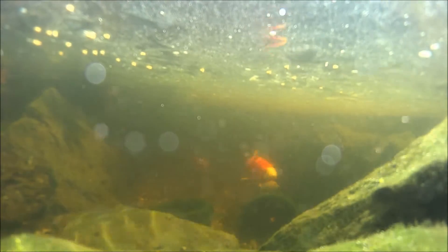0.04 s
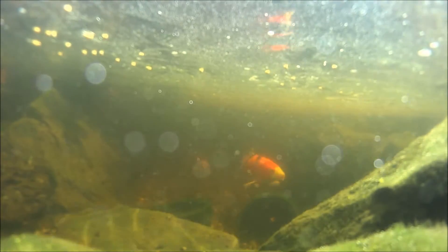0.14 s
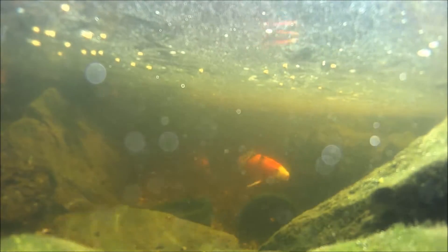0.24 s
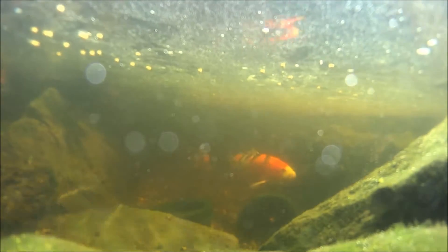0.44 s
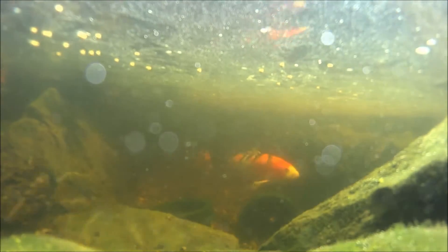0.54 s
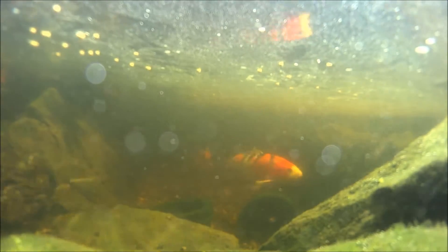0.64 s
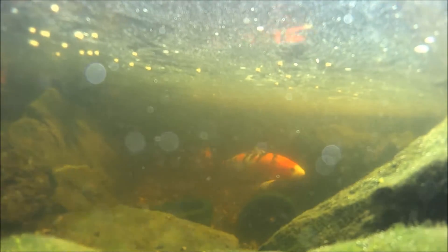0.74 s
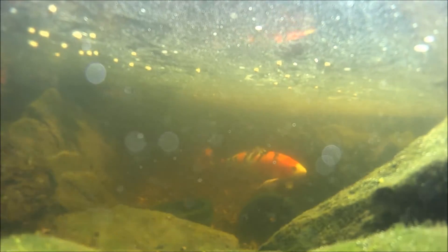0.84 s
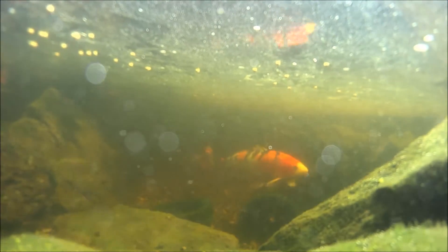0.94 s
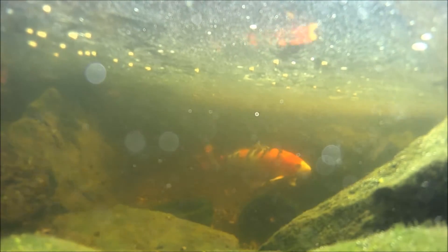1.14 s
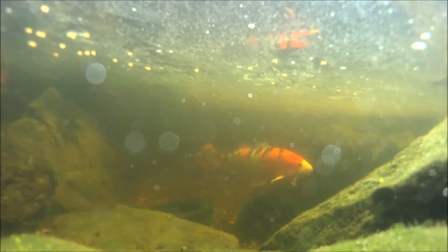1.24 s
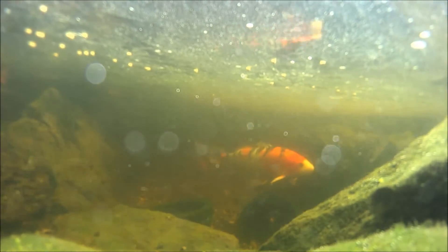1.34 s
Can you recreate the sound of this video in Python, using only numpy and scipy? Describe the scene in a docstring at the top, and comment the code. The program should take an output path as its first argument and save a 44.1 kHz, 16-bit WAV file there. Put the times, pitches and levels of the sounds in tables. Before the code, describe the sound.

A single short, hollow knock is heard from inside a camera case submerged in a pond, followed by three very faint bubble ticks. Behind it all, a pump hums quietly, moving water rumbles and the microphone hisses.

```python
"""Under water in a garden pond, heard from inside a waterproof camera case.
One soft knock sets the case ringing briefly. A pump hums, and the moving water rumbles and
faintly stirs the same ringing note. Three tiny ticks (probably bubbles) follow the knock,
and the microphone hisses throughout."""
import sys
import numpy as np
from scipy import signal
from scipy.fft import rfft, irfft
from scipy.io import wavfile
from scipy.ndimage import uniform_filter1d

SR = 44100
rng = np.random.default_rng(int(sys.argv[2]) if len(sys.argv) > 2 else 0)


def digitize_waveform(pressure):
    """Quantize a signal to 16-bit integers and store it at the path in sys.argv[1].

    Rows of a 2-D input are taken as channels; values are limited to [-1, 1].
    """
    field = np.atleast_2d(pressure).T
    bounded = np.clip(field, -1, 1)
    quanta = np.round(bounded * 32767).astype(np.int16)
    wavfile.write(sys.argv[1], SR, quanta)


N = 61739


def undb(db):
    """Turn decibels into a number to multiply by."""
    return 10 ** (np.asarray(db) / 20)


def unit(x):
    """Scale a sound to an average (rms) level of 1."""
    return x / np.sqrt(np.mean(x ** 2))


def pan(right_db):
    """Left and right gains that make the right side louder by right_db."""
    return undb(np.array([[-right_db], [right_db]]) / 2)


def noise(points):
    """Noise at level 1, its tone shaped by a curve through (Hz, dB) points."""
    hz, db = np.array(points).T
    freqs = np.maximum(np.fft.rfftfreq(N, 1 / SR), 1)
    curve = undb(np.interp(np.log(freqs), np.log(hz), db))
    return unit(irfft(rfft(rng.standard_normal(N)) * curve, N))


def ring(start, rise_s, fade_s):
    """Seconds since a blow, and a loudness curve that rises, then falls 60 dB in fade_s."""
    age = np.maximum(np.arange(N) / SR - start, 0)
    return age, (1 - np.exp(-age / rise_s)) * np.exp(-np.log(1000) * age / fade_s)


def hiss():
    """The microphone hisses: one noise is the same on both sides, one is flipped on the right."""
    # The shared hiss. Each row: frequency in Hz, level in dB.
    shared = [(30, -5), (300, -16), (800, 1.5), (2000, -2.5), (5000, -5), (11000, -7.5)]
    # The flipped hiss, which adds width. Each row: frequency in Hz, level in dB.
    flipped = [(30, -12), (200, -2), (650, 3), (1100, 0.5), (2000, -3), (3500, -9), (6200, -14),
               (11000, -21)]
    return undb(-60) * noise(shared) + undb(-56.5) * noise(flipped) * np.array([[1], [-1]])


def water():
    """Moving water rumbles and keeps the main note of the case faintly ringing."""
    # The water as heard through the case. Each row: frequency in Hz, level in dB.
    tone_curve = [(20, -23), (36, -12), (50, 0), (80, -8.5), (150, -10.5), (185, -4), (240, -16),
                  (340, -11.5), (410, -4.5), (470, 1), (530, -6.5), (640, -20), (1000, -47)]
    flow = signal.hilbert(noise(tone_curve))  # a form that lets us shift every wave
    left = flow * np.exp(-1j)  # one radian (about a sixth of a wave) behind the right
    return undb(-54.5) * pan(right_db=2.5) * np.real([left, flow])


def pump():
    """The tones of the spinning shaft throb against the electric hum of the motor."""
    shaft_hz, speed_drift, mains_hz = 49.06, 0.00033, 120.7
    # The shaft's tones. Each row: waves per turn of the shaft, average level in dB.
    tones = [(1, -73.5), (2, -46.5), (4, -59.5)]
    swell_s, left_lag_s = 0.0377, 0.00051  # shaft and hum swell together at swell_s
    t = np.arange(N) / SR - swell_s - np.array([[left_lag_s], [0]])
    wander = unit(uniform_filter1d(rng.standard_normal(N), size=SR // 4))
    turns = shaft_hz * (t + speed_drift * np.cumsum(wander) / SR)
    shaft = sum(undb(db) * np.sin(2 * np.pi * waves * turns) for waves, db in tones)
    hum = undb(-52.5) * np.sin(2 * np.pi * mains_hz * t)
    return np.sqrt(2) * (shaft + hum)


def ticks():
    """Each tiny bubble rings for a few thousandths of a second."""
    # Each row: start in seconds, pitch in Hz, level in dB, seconds to fade by 60 dB.
    bubbles = [(0.8235, 4970, -45, 0.0062), (0.9443, 5660, -44, 0.0033), (0.9843, 6600, -41.5, 0.004)]
    out = np.zeros(N)
    for start, hz, db, fade_s in bubbles:
        age, loudness = ring(start, rise_s=0.00029, fade_s=fade_s)
        out += undb(db) * loudness * np.sin(2 * np.pi * hz * age)
    return out


def knock():
    """A soft blow rings the case's own notes, plus a faint cluster of high ones made from noise."""
    # The notes of the case. Each row: pitch in Hz, level in dB, seconds to fade by 60 dB,
    # direction of the first swing (1 or -1).
    case_notes = [ (35, -41, 0.066, -1), (290, -30, 0.059, 1), (412, -23, 0.02, 1), (469.7, -10, 0.098, -1),
                  (800, -73, 0.018, 1), (970, -13, 0.016, -1), (1183, -12.5, .026, -1),
                  (1313, -9, 0.022, 1), (1270, -24, 0.074, 1), (1532, -36, 0.043, 1), (2540, -47, 0.074, 1),
                  (4530, -47.5, 0.0072, 1), ]
    start_s, rise_s = 0.2181, 0.00046
    lag_radians = np.array([[1.05], [0]])  # left swings behind right
    notes = np.zeros((2, N))
    for hz, db, fade_s, swing in case_notes:
        age, loudness = ring(start_s, rise_s, fade_s)
        notes += swing * undb(db) * loudness * np.cos(2 * np.pi * hz * age - lag_radians)
    cluster_hz, width_hz = 2305, 1240
    freqs = np.fft.rfftfreq(N, 1 / SR)
    band = 1 / (1 + (2 * (freqs - cluster_hz) / width_hz) ** 2)
    cluster = irfft(rfft(rng.standard_normal((2, N))) * band, N)
    cluster = unit(cluster + cluster[::-1] / 2)  # each side gets some of the other
    _, cluster_loudness = ring(start_s, rise_s, fade_s=0.06)
    return undb(-1) * pan(right_db=3) * notes + undb(-42) * cluster * cluster_loudness


def scene():
    """Hiss, water and pump lie behind the ticks and the knock."""
    return hiss() + water() + pump() + ticks() + knock()


def record(dry):
    """The camera steeply cuts off the highest treble."""
    top_hz = 11050
    treble_cut = signal.ellip(12, 0.1, 80, top_hz, fs=SR, output="sos")
    return signal.sosfilt(treble_cut, dry)


dry = scene()
out = record(dry)
digitize_waveform(out)
```